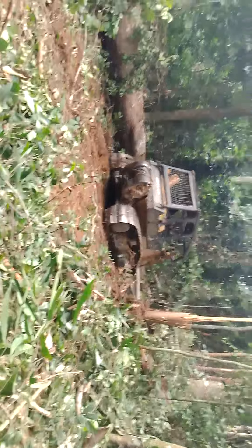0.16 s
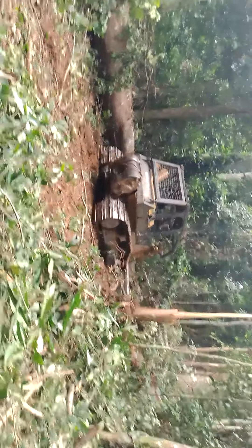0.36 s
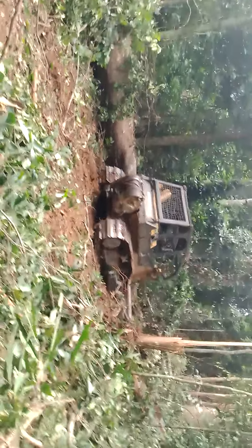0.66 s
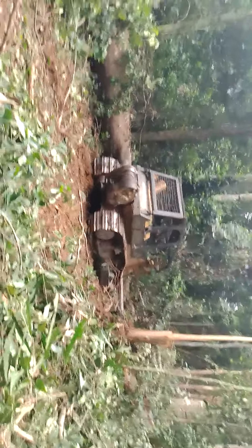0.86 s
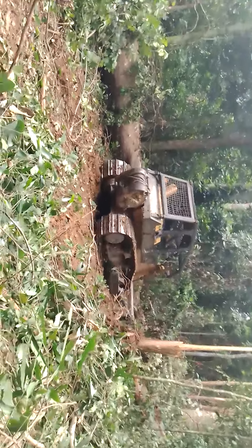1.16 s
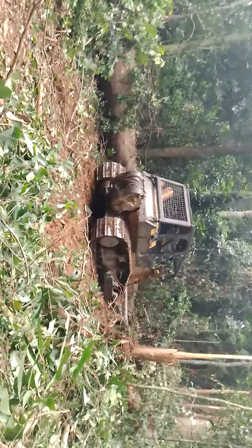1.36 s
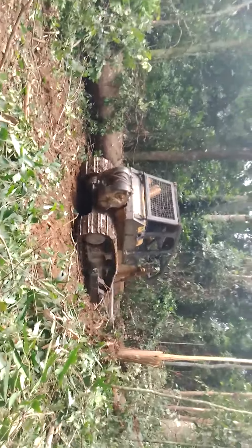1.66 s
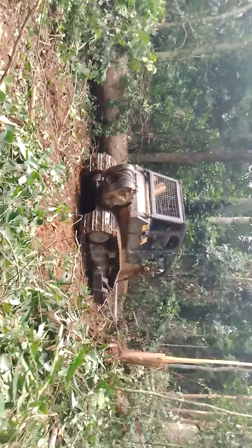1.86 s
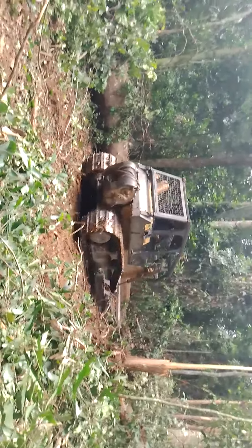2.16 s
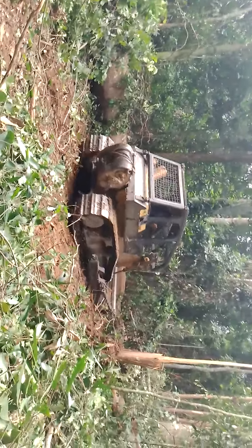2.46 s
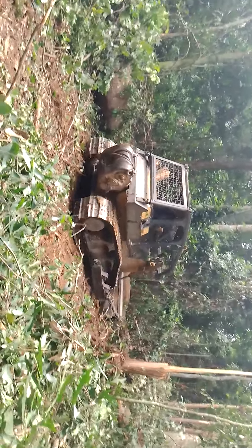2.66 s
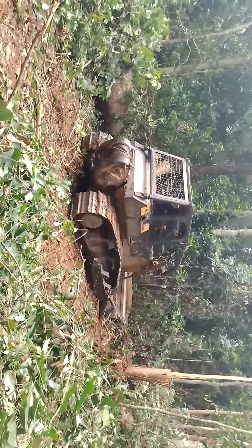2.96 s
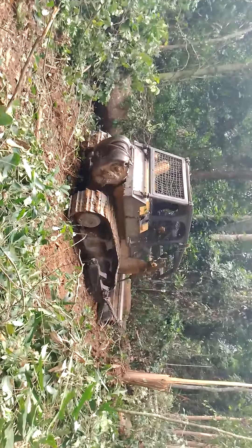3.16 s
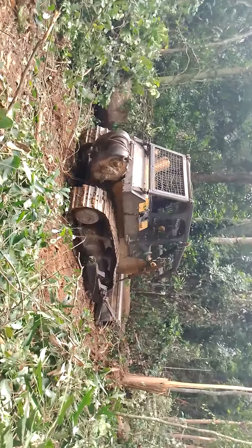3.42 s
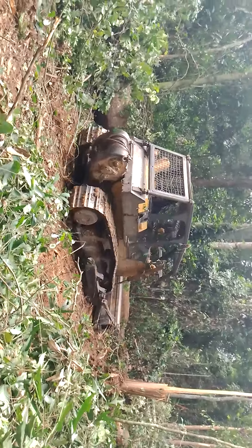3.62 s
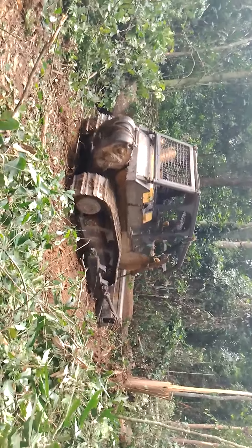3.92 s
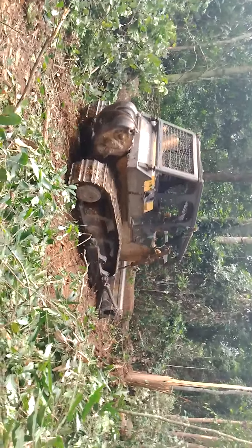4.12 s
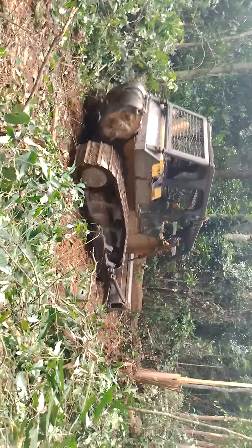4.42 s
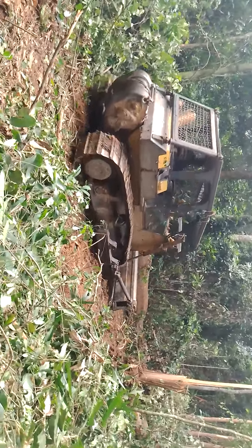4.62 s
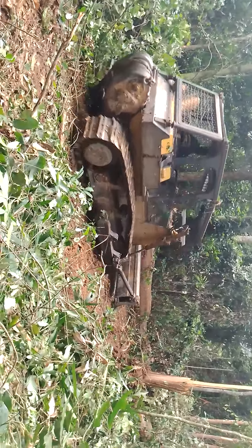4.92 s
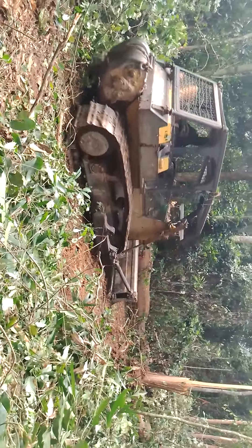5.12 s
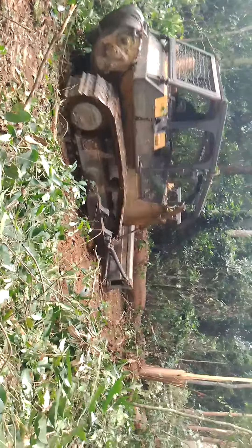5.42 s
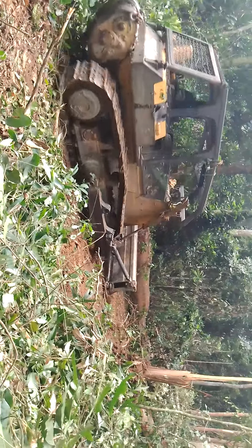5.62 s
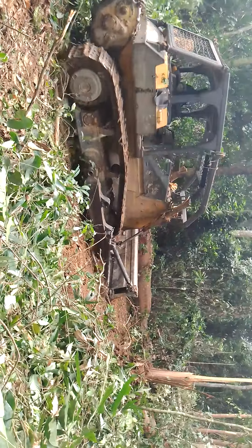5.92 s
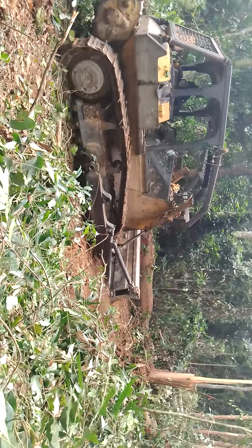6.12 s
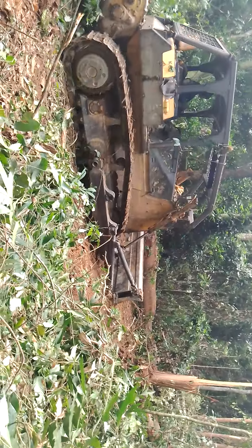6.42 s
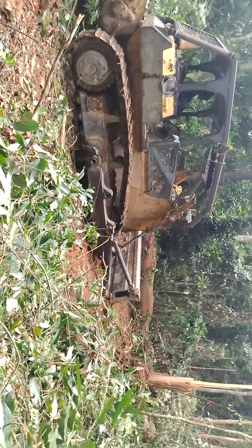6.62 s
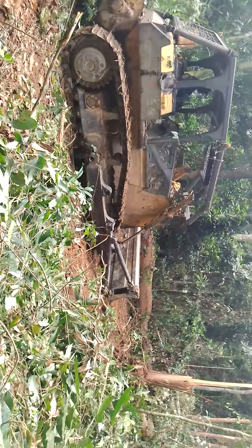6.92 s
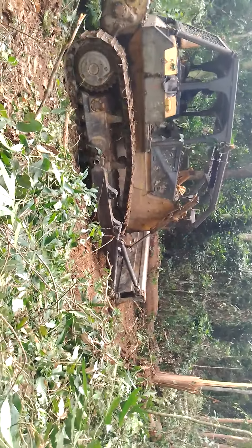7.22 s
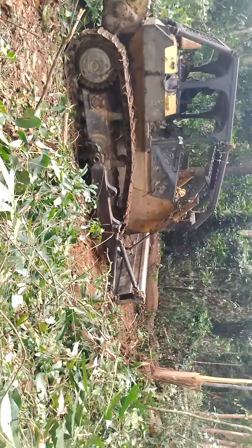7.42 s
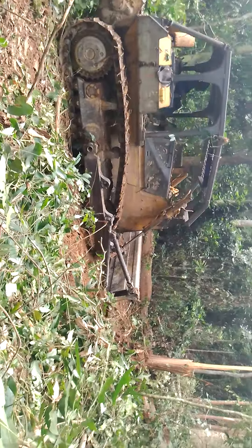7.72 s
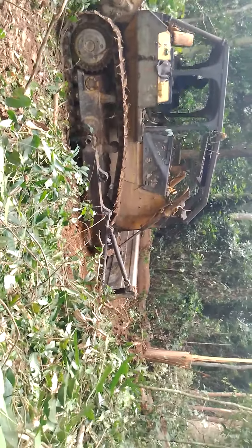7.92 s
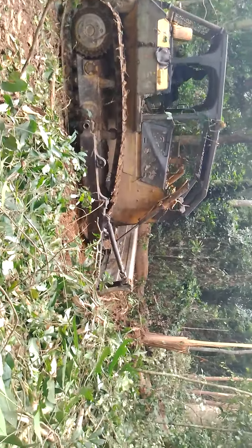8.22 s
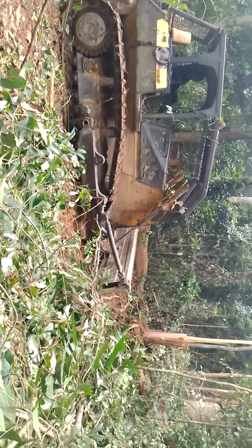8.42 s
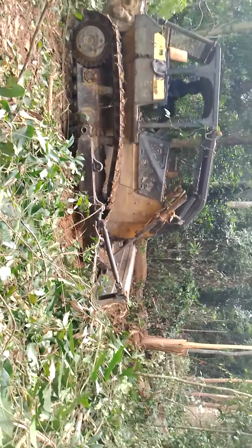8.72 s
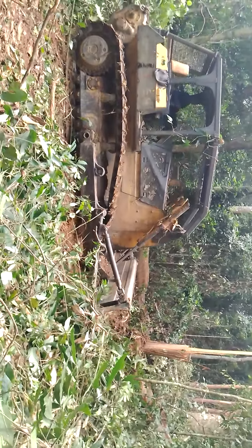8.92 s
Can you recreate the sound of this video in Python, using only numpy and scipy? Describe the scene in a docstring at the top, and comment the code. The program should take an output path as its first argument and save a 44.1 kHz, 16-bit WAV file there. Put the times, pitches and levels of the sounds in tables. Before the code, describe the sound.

Steel tracks rattle and hiss ever louder as a tracked diesel machine draws near, its turbo whistling thinly, slackening twice, then biting with a crunch.

```python
"""Crawler bulldozer driving closer

A diesel bulldozer nears from about 30 m to 9 m. Shaped noise makes the boom, roar and rattle of its tracks, and
a bright hiss near 9 kHz, narrow when faint and wider when loud. Sines make an engine hum that drifts upward and
rises in pitch when the drive eases off; narrow noise makes a thin, breathy turbo whistle that sinks and climbs.
Squeals, plate buzzes, hums and drones come in short spells, with sharp clinks and soft thuds between them. The
drive eases off near 2.9 s and again near 6.7 s, where it takes up with a grinding crunch."""
import sys
import numpy as np
from scipy import signal
from scipy.fft import rfft, irfft, next_fast_len
from scipy.io import wavfile
from scipy.ndimage import uniform_filter1d, map_coordinates

SR = 44100
rng = np.random.default_rng(int(sys.argv[2]) if len(sys.argv) > 2 else 0)


def wav_record(signal):
    """Record a signal, one row per channel, as 16-bit PCM in the file named by sys.argv[1]."""
    frames = np.transpose(np.atleast_2d(signal))
    bounded = np.clip(frames, -1, 1)
    # unit amplitude maps onto the largest positive 16-bit level
    quanta = np.round(bounded * 32767).astype(np.int16)
    wavfile.write(sys.argv[1], SR, quanta)


N = 399987

# Every level law below holds: level when near/dB, loss per doubling of distance/dB,
# loss when eased off/dB, gain in the jolt/dB (negative dips)

# Noise colours of the shaking hull and tracks: f/Hz, relative level/dB per Hz
BOOM_SPECTRUM = [(150, -70), (172, -22.5), (190, -19.5), (240, -9.5), (285, -0.5), (350, 2), (390, -2.5),
                 (450, -28), (700, -60)]
ROAR_SPECTRUM = [(200, -68), (320, -20), (390, -4), (450, 1), (520, 0), (620, 1.5), (700, -1), (780, 0),
                 (880, -27), (1400, -50)]
RATTLE_SPECTRUM = [(450, -80), (700, -2.5), (820, 0.5), (930, 0.5), (1040, 0), (1170, 1), (1300, -1.5),
                   (1450, -4.5), (1700, -3.5), (2200, -11.5), (3500, -19)]
# Level laws of the three layers: near/dB, per doubling/dB, eased off/dB, jolt/dB
BOOM_LAW = (-32.5, 5.5, 3, 1)
ROAR_LAW = (-28.5, 2.5, 3.5, 3.5)
RATTLE_LAW = (-31, 4, 4, 3.5)
# Slow swells and dips of boom, roar and rattle: start t/s, length t/s, boom level/dB, roar and rattle level/dB
LEVEL_SWELLS = [(-.2, 0.33, 3.5, 4), (1.65, 0.46, 1, 1), (2.28, 0.62, -2.5, 0), (2.9, 1.15, 1, 1.14),
                (3.95, 1.1, 3, 0), (5, 1.1, 3, 0.5), (6.2, .5, 1.5, 0), (6.984, 0.49, 1.5, 1.5)]


def running_gear(firing, state):
    """Links and rollers shake the hull; roar and rattle reach higher with presence."""
    presence = presence_of(state)
    throb = 1 + 0.052 * np.cos(firing)
    boom = coloured(throb * grit(40, depth_db=1.0), BOOM_SPECTRUM)

    def roar_edge(hz, near):
        return 1 / (1 + (hz / (640 + 260 * near)) ** 8)

    def rattle_edge(hz, near):
        return amp(-20.0) + 1 / (1 + (hz / (1290 + 260 * near)) ** 28)

    roar = coloured(throb * grit(130, depth_db=1.2), ROAR_SPECTRUM)
    roar = opening(roar, roar_edge, presence, patchy_db=2.65)
    rattle = coloured(grit(200, depth_db=0.44), RATTLE_SPECTRUM)
    rattle = opening(rattle, rattle_edge, presence, patchy_db=2.0)

    hull_db = swells_db((start, length, db) for start, length, db, _ in LEVEL_SWELLS)
    tracks_db = swells_db((start, length, db) for start, length, _, db in LEVEL_SWELLS)
    hull = amp(level_db(BOOM_LAW, state) + hull_db) * boom
    tracks = amp(level_db(ROAR_LAW, state)) * roar + amp(level_db(RATTLE_LAW, state)) * rattle
    return hull + amp(tracks_db) * tracks


# Broad hiss: f/Hz, relative level/dB per Hz
BROAD_HISS_SPECTRUM = [(900, -11), (1600, -0.5), (2300, -7.5), (2800, -1), (4000, -1.5), (4700, 1.5),
                       (6200, 1.5), (7500, 3.5), (9200, 10), (10800, 7), (12000, 2), (13000, 5.5),
                       (13700, 2.5), (15700, 1.5)]
# Level laws of the bright and the broad hiss: near/dB, per doubling/dB, eased off/dB, jolt/dB
BRIGHT_HISS_LAW = (-20, 8.5, 7.5, 3)
BROAD_HISS_LAW = (-34.5, 8, 12, 9)
FAR_HISS_DB = -41.5  # floor added in power to the broad hiss law


def hisses(state):
    """A bright noise band near 9 kHz over a broad hiss; with presence, the shoes ring through it."""
    presence = presence_of(state)
    bright = opening(grit(350, depth_db=0.5), bright_band, presence, patchy_db=1.5)

    def fuller(hz, near):
        """Tilt gently toward the lower hiss with presence."""
        return (hz + 100) ** (-0.05 * near)

    broad = coloured(grit(500, depth_db=0.36), BROAD_HISS_SPECTRUM)
    broad = opening(broad, fuller, presence, patchy_db=2.5)
    ring = presence * unit(filtered(grit(200, depth_db=1.5), shoes))

    broad_gain = np.hypot(amp(level_db(BROAD_HISS_LAW, state)), amp(FAR_HISS_DB))
    flutter = amp(0.4 * wobble(30))
    both = amp(level_db(BRIGHT_HISS_LAW, state)) * bright + broad_gain * broad
    return flutter * both + amp(-14) * broad_gain * ring


def bright_band(hz, presence):
    """Response of a high hiss band, narrow when faint, wider when loud."""
    offset = np.abs(hz - 9220)
    flanks = amp(-9.5) + 1 / (1 + (offset / (450 + 960 * presence)) ** 16)
    return flanks / (1 + (offset / (780 + 260 * presence)) ** 2)


# Ringing modes of the track shoes: f/Hz, width f/Hz, relative level/dB
SHOE_MODES = [(1952, 700, 4), (2710, 260, 3.5), (3500, 370, 1), (4760, 260, 8), (5190, 220, 0),
              (6560, 282, 11), (7650, 640, 13), (10800, 580, 13)]


def shoes(f):
    """Response of the ringing track shoes: a sum of damped modes."""
    return sum(amp(db) * resonance(f, hz, width) for hz, width, db in SHOE_MODES)


# Weaker engine lines: multiple of the four-stroke cycle, level/dB
LOW_ORDERS = [(6, -61.5), (10, -60.5), (11, -64.5)]
# Soft exhaust rumble: f/Hz, relative level/dB per Hz
RUMBLE_SPECTRUM = [(20, -33), (45, -28), (68, -23), (85, -14), (105, -3.5), (125, 1), (148, -8), (163, -11),
                   (185, -1.5), (260, -7), (500, -39)]
# Level laws of strongest order and rumble: near/dB, per doubling/dB, eased off/dB, jolt/dB
ENGINE_LAW = (-35, 7.5, 4, -16)
RUMBLE_LAW = (-52.5, 1.5, 3, 0)


def engine(cycle, state):
    """Orders of the six-cylinder diesel: sines locked to its cycle, over a soft exhaust rumble."""
    main_db = level_db(ENGINE_LAW, state) + 0.95 * wobble(7)
    hum = amp(main_db) * unit(np.sin(MAIN_ORDER * cycle + 0.24 * wobble(20)))
    for order, db in LOW_ORDERS:
        line = unit(np.sin(order * cycle + 0.2 * wobble(15)))
        hum = hum + amp(db + 0.68 * wobble(9)) * line
    rumble = coloured(grit(20, depth_db=2), RUMBLE_SPECTRUM)
    return hum + amp(level_db(RUMBLE_LAW, state)) * rumble


MAIN_ORDER, UNLOADED_RISE_HZ = 22, 17  # strongest multiple of the cycle; its rise in pitch when slack
# Engine speed under load: t/s, strongest order f/Hz
ENGINE_SPEED = [(0, 293), (2.4, 297), (4.6, 301), (7.4, 299), (8.3, 308), (9.07, 310)]


def engine_cycle():
    """Phase of the four-stroke cycle; the engine speeds up when the drive is eased off."""
    main_hz = curves(ENGINE_SPEED)[0] + UNLOADED_RISE_HZ * eased()
    return turns(main_hz / MAIN_ORDER)


# Turbocharger speed under load: t/s, whistle f/Hz
TURBO_SPEED = [(0, 12250), (2.2, 12850), (3.2, 12480), (5.85, 12190), (6, 12510), (6.7, 13150),
               (7.35, 12600), (7.8, 13000), (9.07, 12800)]
# Level law of the whistle: near/dB, per doubling/dB, eased off/dB, jolt/dB
TURBO_LAW = (-46.3, 5, 8.5, 0)
# Flares of the whistle: start t/s, length t/s, added level/dB
WHISTLE_FLARES = [(3.6, .38, 13), (5.9, .6, 4), (7.02, 0.57, 5), (8.03, .33, 11), (8.85, 0.52, 9)]
TURBO_SAG_HZ, TURBO_LAG_S = 3450, 0.27  # slowing with the drive fully eased off; rotor inertia
TURBO_PEAK_HZ, TURBO_PEAK_WIDTH_HZ, TURBO_PEAK_DB = 9630, 204, 12  # boost near this pitch


def turbo(state):
    """The breathy whistle sinks when the load drops and climbs back, lagging through rotor inertia."""
    _, ease, _ = state
    keep = np.exp(-1 / (TURBO_LAG_S * SR))
    lagged_ease = signal.lfilter([1 - keep], [1, -keep], ease)
    hz = curves(TURBO_SPEED)[0] - TURBO_SAG_HZ * lagged_ease
    peak_db = TURBO_PEAK_DB / (1 + ((hz - TURBO_PEAK_HZ) / TURBO_PEAK_WIDTH_HZ) ** 2)
    db = level_db(TURBO_LAW, state) + peak_db + swells_db(WHISTLE_FLARES) + 2 * wobble(18)
    whistle = fuzzy_tone(hz, width=200) + 0.5 * fuzzy_tone(hz, width=650)
    return amp(db) * unit(whistle)


# Final drive humming in spells: start t/s, length t/s, first f/Hz, last f/Hz, level/dB
DRIVE_HUMS = [(1.65, 0.7, 186, 197, -51), (2.5, .38, 210, 220, -48.5), (4.1, 1.2, 200, 242.4, -49),
              (5.4, 0.69, 234, 185.6, -46.5)]
# Track chains droning in spells: start t/s, length t/s, first f/Hz, last f/Hz, level/dB
CHAIN_DRONES = [(-.4, 1.17, 408, 425.5, -33), (.76, 0.92, 432, 456.4, -36), (1.72, 0.51, 544.9, 596.5, -34),
                (2.52, 0.23, 625, 649, -35), (2.78, 0.46, 460, 476, -37.5), (3.28, .6, 615, 599, -40),
                (4, 1.07, 555, 606, -34), (5.25, 0.81, 591, 576.5, -32), (6.5, 0.24, 457, 456, -31),
                (7.55, .6, 462, 492, -34)]


def transmission():
    """The final drive hums and the chains drone as fuzzy tones, each spell gliding in pitch."""
    hum_hz, hum_gain = spells(DRIVE_HUMS)
    drone_hz, drone_gain = spells(CHAIN_DRONES)
    wavering = np.sin(turns(drone_hz + 7 * wobble(19)))
    drone = unit(fuzzy_tone(drone_hz, width=45) + 0.83 * wavering)
    return hum_gain * fuzzy_tone(hum_hz, width=18) + drone_gain * drone


# Track pin squeals: start t/s, length t/s, f/Hz, level/dB, glide f/Hz
PIN_SQUEALS = [(0, 0.25, 9400, -46, -750), (.28, .18, 8150, -42, -120), (.55, 0.18, 9300, -33.5, -3),
               (.8, 0.69, 9100, -38, 0.5), (2.42, .23, 6920, -53, -100), (2.65, 0.66, 9100, -37, 0),
               (3.176, 0.344, 9650, -42, -62), (3.72, .4, 8750, -42, -120), (4.55, 0.37, 8070, -49, 0),
               (6.45, .35, 7080, -40.5, 131), (6.149, 0.52, 10840, -51, 0), (7.651, 1.29, 7000, -39, 122.5),
               (7, 1.61, 11000, -41, 0.5), (8.7, 0.57, 7480, -40, 0)]


def squeals():
    """Track pins bind and sing high, gliding as they go."""
    return stick_slip(PIN_SQUEALS, width=170, waver_hz=45)


# Loose guard plates buzzing: start t/s, length t/s, f/Hz, level/dB
GUARD_PLATES = [(-.2, 0.87, 1122, -41.5), (.6, 1, 840, -40), (1.2, 0.54, 1424, -49.5),
                (1.6, 0.75, 923, -40.5), (4.55, 0.74, 1666, -56), (5.78, 0.25, 1926, -58.5),
                (6.45, 0.41, 1756, -50), (7.05, 0.667, 1690, -45.5), (7.3, 0.69, 1800, -53),
                (8, 0.68, 1680, -52), (8.7, 0.56, 1896, -49.5)]


def plates():
    """Loose guard plates buzz as narrow, wavering tones."""
    return stick_slip(GUARD_PLATES, width=110, waver_hz=15)


# Sharp track clinks: t/s, noise level before the resonance/dB, 60 dB decay t/s, f/Hz
TRACK_CLINKS = [(1.263, -14, .015, 9200), (2.504, -19, .015, 9280), (4.152, -6, 0.024, 8900),
                (4.567, -26.5, .025, 4540), (8.008, -18, 0.016, 9200), (8.3626, -5, 0.042, 9350)]
# Slack track slapping down: t/s, level before a 5 dB lift and soft attack/dB, f/Hz
TRACK_THUDS = [(6.99, -27, 320), (7.236, -27, 219)]


def blows():
    """Clinks are decaying noise through a resonance; the slack track thuds as decaying sines."""
    out = np.zeros(N)
    for s, db, t60, hz in TRACK_CLINKS:
        age = np.maximum(clock() - s, 0)
        crack = (age > 0) * amp(db - 60 * age / t60) * rng.standard_normal(N)
        out += filtered(crack, lambda f: resonance(f, hz, 2400) ** 2)
    for s, db, hz in TRACK_THUDS:
        age = np.maximum(clock() - s, 0)
        soft_attack = 1 - np.exp(-age / 0.015)
        out += amp(db + 5 - 60 * age / 0.15) * soft_attack * np.sin(2 * np.pi * hz * age)
    return out


CRUNCH_DB, CRUNCH_ATTACK_S, CRUNCH_HOLD_S, CRUNCH_DECAY_S = -28, 0.082, 0.075, 0.16


def crunch():
    """The shoes grind against the sprocket as the drive bites: gritty noise through their modes."""
    grind = unit(filtered(grit(180, depth_db=0.5), shoes))
    return amp(CRUNCH_DB) * bite(CRUNCH_ATTACK_S, CRUNCH_HOLD_S, CRUNCH_DECAY_S) * grind


# The approach: t/s, distance/m
DISTANCE = [(0, 30.3), (1.4, 26.4), (2, 20), (2.85, 17.1), (4.3, 16), (5.3, 12.8), (6.55, 9.2),
            (7.4, 10.23), (9.07, 9.14)]
NEAR_M = 9  # distance at which the level laws read "near"
JOLT_ATTACK_S, JOLT_HOLD_S, JOLT_DECAY_S = 0.028, 0.022, 0.031


def motion():
    """State of the machine: doublings of distance, easing off, and the jolt."""
    away = np.log2(curves(DISTANCE)[0] / NEAR_M)
    return away, eased(), bite(JOLT_ATTACK_S, JOLT_HOLD_S, JOLT_DECAY_S)


# The driver eases off: start t/s, fall t/s, resumes at t/s, rise t/s, depth 0-1
EASE_OFFS = [(2.879, .25, 3.68, 0.361, .82), (6.69, 0.063, 6.955, 0.029, 0.99)]


def eased():
    """How far the drive is eased off: 0 under load, 1 slack."""
    t = clock()
    slack = np.zeros(N)
    for start, fall, resume, rise, depth in EASE_OFFS:
        release = np.clip((t - start) / fall, 0, 1)
        slack += depth * release * np.clip(1 - (t - resume) / rise, 0, 1)
    return slack


BITE_S = 6.97  # the drive bites again


def bite(attack, hold, decay):
    """Attack, hold and release from the moment the drive bites."""
    age = clock() - BITE_S
    return np.clip(age / attack, 0, 1) * np.exp(-np.maximum(age - attack - hold, 0) / decay)


def level_db(law, state):
    """Level of a layer from its law and the machine's motion."""
    near_db, far_db, eased_db, jolt_db = law
    away, ease, jolt = state
    return near_db - far_db * away - eased_db * ease + jolt_db * jolt


DULL_PER_DOUBLING, DULL_EASED = 0.86, 0.64  # presence lost per doubling of distance; share lost when slack


def presence_of(state):
    """How fully the machine is heard, 0-1: most when near and under load."""
    away, ease, _ = state
    return np.clip(1 - DULL_PER_DOUBLING * away, 0.05, 1) * np.clip(1 - DULL_EASED * ease, 0, 1)


def stick_slip(rows, width, waver_hz):
    """Each loose or binding part sings briefly at a wavering pitch, which may glide."""
    bend, gain = turns(waver_hz * wobble(14)), fuzzy_gain(width)
    out = np.zeros(N)
    for start, length, hz, db, *glide in rows:
        on = slice(max(int(start * SR), 0), min(int((start + length) * SR), N))
        progress = (np.arange(on.start, on.stop) / SR - start) / length
        phase = turns(hz + sum(glide) * progress) + bend[on]
        fuzz = np.roll(gain, rng.integers(N))[on]  # a fresh stretch for each part
        tone = np.real(fuzz * np.exp(1j * phase))
        out[on] += amp(db) * np.sqrt(np.abs(np.sin(np.pi * progress))) * tone
    return out


def spells(rows):
    """Pitch and gain of a part that sounds in gliding spells, one after the other."""
    glides = []
    for start, length, first, last, _ in rows:
        glides += [(start, first), (start + length, last)]
    gain = sum(amp(db) * swell(start, length) for start, length, _, _, db in rows)
    return curves(sorted(glides))[0], gain


def swell(start, length):
    """A rounded rise and fall, 0-1."""
    progress = np.clip((clock() - start) / length, 0, 1)
    return np.sqrt(np.abs(np.sin(np.pi * progress)))


def swells_db(rows):
    """Level change in dB from a row of passing swells and dips."""
    return sum(db * swell(start, length) for start, length, db in rows)


def opening(x, response, presence, patchy_db):
    """Filter x by response(Hz, presence) at constant power, with narrow patches swelling and fading."""
    hz, t, z = signal.stft(x, SR, nperseg=2048)
    gain = response(hz[:, None], np.interp(t, clock(), presence))
    power = np.mean(np.abs(z) ** 2, axis=1, keepdims=True)
    gain = gain / np.sqrt(np.sum(power * gain ** 2, axis=0))
    patches = uniform_filter1d(rng.standard_normal(z.shape), size=4, axis=0)  # across frequency
    patches = unit(uniform_filter1d(patches, size=14, axis=1))  # across time
    return unit(signal.istft(z * gain * amp(patchy_db * patches), nperseg=2048)[1][:N])


def resonance(f, hz, width):
    """Response of one damped mode."""
    return 1j * f * width / (hz * hz - f * f + 1j * f * width)


def fuzzy_gain(width):
    """Random amplitude and phase, with width knots a second, that smear a tone of rms 1."""
    return unit(wobble(width)) + 1j * unit(wobble(width))


def fuzzy_tone(hz, width):
    """A narrow band of noise riding on a pitch curve."""
    return np.real(fuzzy_gain(width) * np.exp(1j * turns(hz)))


def grit(rate, depth_db):
    """Noise of countless small contacts, bunching about rate times a second."""
    return unit(rng.standard_normal(N) * amp(depth_db * wobble(rate)))


def coloured(x, spectrum):
    """x shaped by the (Hz, dB) spectrum, at rms 1."""
    f, db = np.transpose(spectrum)
    return unit(filtered(x, lambda hz: amp(np.interp(np.log(hz + 1), np.log(f), db))))


def filtered(x, response):
    """x times a response of frequency."""
    m = next_fast_len(N + SR // 4)
    return irfft(rfft(x, m) * response(np.fft.rfftfreq(m, 1 / SR)), m)[:N]


def wobble(rate):
    """A smooth random curve, rate knots a second."""
    return map_coordinates(rng.standard_normal(int(N * rate / SR) + 4), [clock() * rate])


def turns(hz):
    """Running phase of a changing frequency, in radians."""
    return 2 * np.pi * np.cumsum(hz) / SR


def curves(rows):
    """One value per sample for each column after the time."""
    s, *cols = np.transpose(rows)
    return [np.interp(clock(), s, c) for c in cols]


def clock():
    """Time of every sample in seconds."""
    return np.arange(N) / SR


def amp(db):
    """Decibels to gain."""
    return 10 ** (np.asarray(db) / 20)


def unit(x):
    """Scale to rms 1."""
    return x / np.sqrt(np.mean(x ** 2) + 1e-20)


def scene():
    """The whole machine, heard from one spot."""
    state = motion()
    cycle = engine_cycle()
    firing = 6 * cycle  # six cylinders fire once each per cycle
    tracks = running_gear(firing, state) + hisses(state)
    power = engine(cycle, state) + turbo(state) + transmission()
    details = squeals() + plates() + blows() + crunch()
    return (tracks + power + details) * np.ones((2, 1))


TOP_HZ = 15700  # upper band limit


def record(dry):
    """A mono microphone with a steep band limit feeds both channels."""
    return np.array([filtered(channel, lambda hz: hz < TOP_HZ) for channel in dry])


dry = scene()
out = record(dry)
wav_record(out)
```